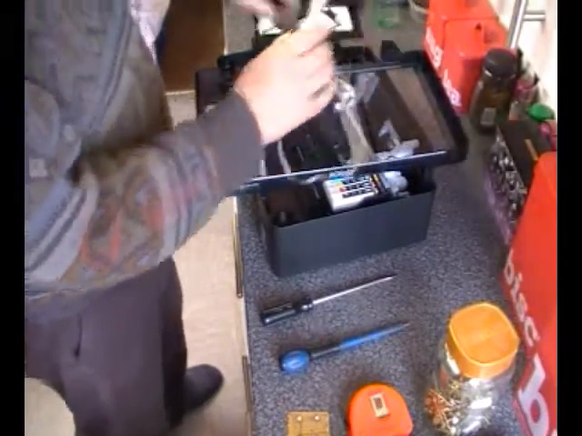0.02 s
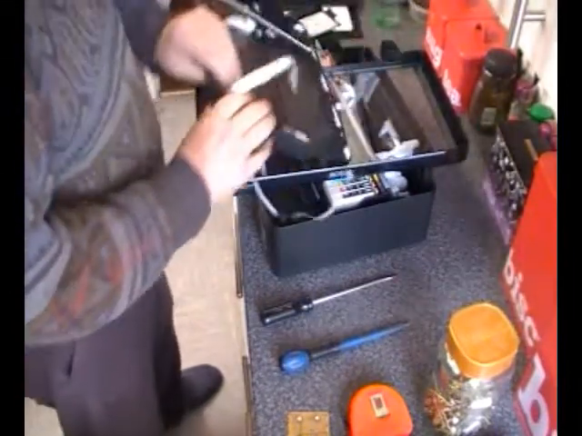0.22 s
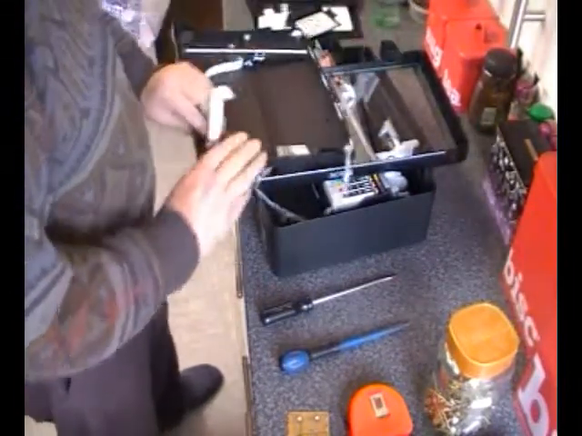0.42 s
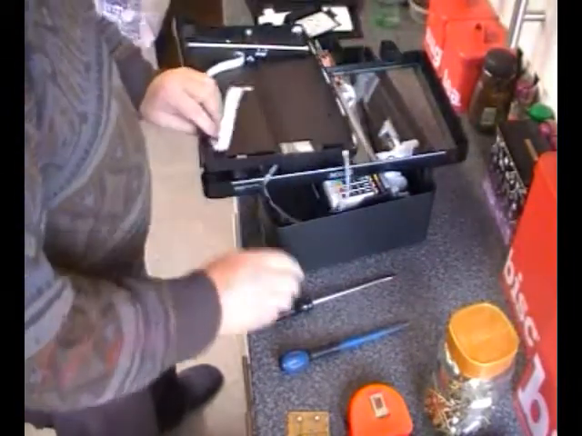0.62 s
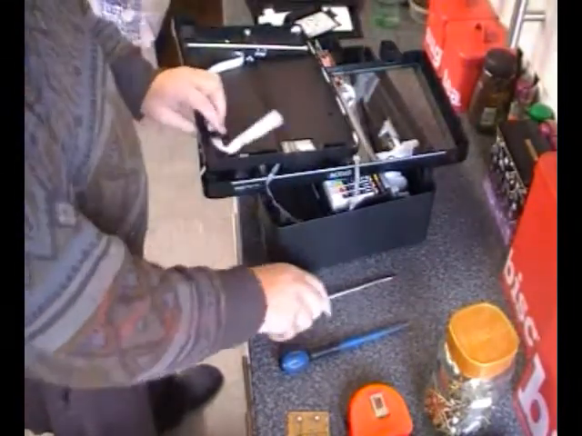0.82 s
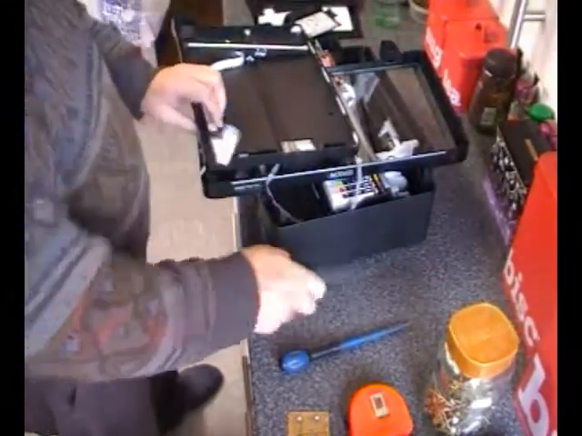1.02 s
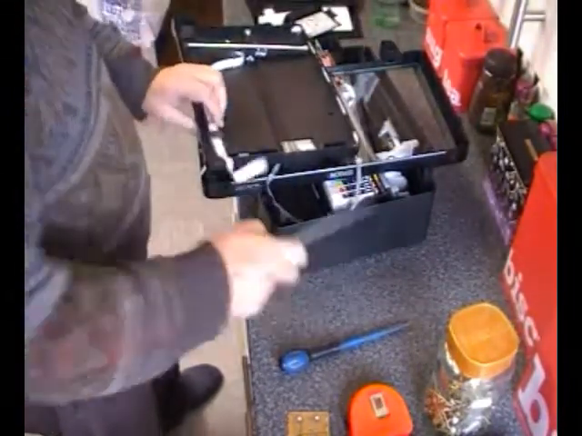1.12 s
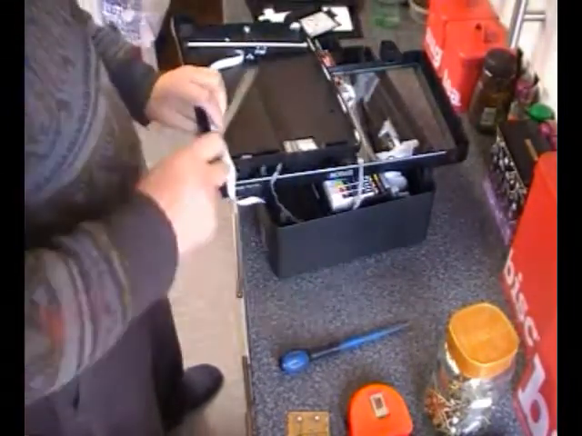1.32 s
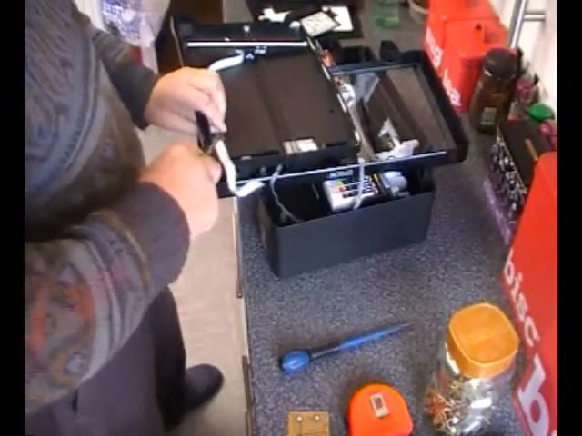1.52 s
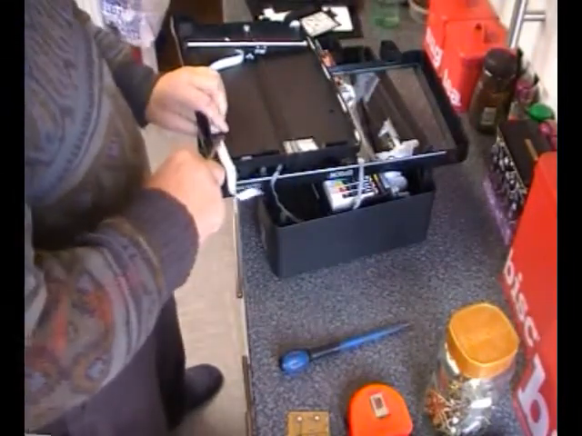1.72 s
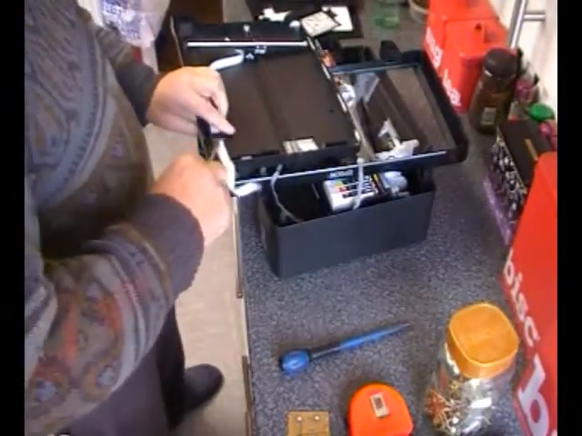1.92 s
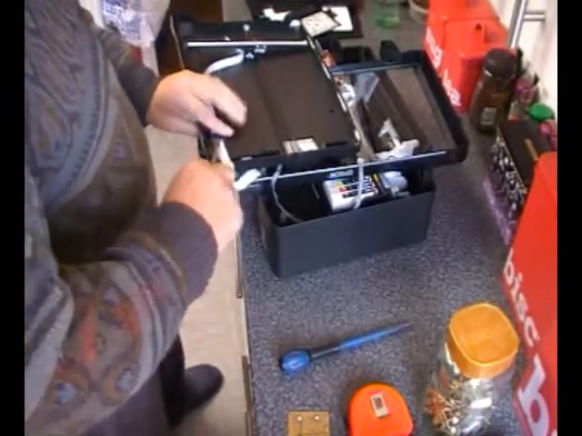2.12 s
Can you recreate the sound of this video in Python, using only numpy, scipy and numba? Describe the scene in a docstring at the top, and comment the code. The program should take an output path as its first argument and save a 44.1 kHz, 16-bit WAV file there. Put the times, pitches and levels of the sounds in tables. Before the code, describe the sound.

Plastic knocks and scrapes from a taken-apart printer, one sharp metal clink, then sparse clicks

```python
"""A small hard room: hands work a ribbon cable loose in an opened printer on a worktop, close by.
Plastic clicks and knocks are noise bursts over ringing casing modes; the cable's scrapes are dense ticks.
A loose panel edge and a snapping latch chatter as fading noise through damped resonances.
A screwdriver clinks and a small spring pings on decaying sines; a dense room tail and faint hiss lie behind."""
import sys
import numpy as np
from scipy import signal
from scipy.fft import rfft, irfft, next_fast_len
from scipy.io import wavfile
from scipy.ndimage import uniform_filter1d
from numba import njit

SR = 44100
rng = np.random.default_rng(int(sys.argv[2]) if len(sys.argv) > 2 else 0)


def to_wav(s):
    """Save 16-bit WAV."""
    ch = np.atleast_2d(s).T  # columns
    pcm = np.round(np.clip(ch, -1, 1) * 32767)  # PCM
    wavfile.write(sys.argv[1], SR, pcm.astype(np.int16))


N = 94815
TIME_S = np.arange(20480) / SR  # time axis of one sound or room tail

# Plastic clicks and knocks. Each row: start in seconds, level in dB, bass shelf in dB, treble shelf in dB,
# crack over the ring in dB, casing modes in dB, the part's own resonance in Hz, its lift in dB.
KNOCK_EVENTS = [(0.001, -27, -9.5, 3.5, -4.5, -41, 590, 15.5), (0.03, -28, 4, 16, -3, -30, 2500, 14.5),
                (0.160, -26.5, -3.5, -1.5, 1, -20, 4140, 8.5), (0.176, -38, 3, -3, 6, -14, 2200, 8),
                (0.21, -23.5, -9.5, -13, -0.5, -12, 1280, 6.5), (0.296, -27.5, 4, 0, -9, -7, 4060, 13),
                (0.330, -20, -2, 0, -11, -20, 2400, 0.5), (0.3547, -20.5, -2, -6, 11, -22, 3270, 7.5),
                (0.369, -20, -4, -7, -21, -7, 2410, -7), (0.382, -20.5, 17, 15.5, -1, -6, 397, -1),
                (0.411, -33, 11, 3, 3, -6, 2000, -8), (0.4937, -14, -6.5, -6.5, -3, 0, 1700, 2),
                (0.510, -15.5, 6.5, 8, 5.5, -12, 1700, 5), (0.517, -26, 7, -36, 10, -33, 3620, 1),
                (0.528, -17, 10, 12.5, 3, 8.5, 2650, 16), (0.5373, -25, -1, 4, 1, -28, 3050, -9),
                (0.562, -25.5, -3, -4, 15.5, -4, 850, 23), (0.5721, -30.5, 6, 2, 20.5, -19, 2780, 4),
                (0.772, -37.5, -7, 0, -33, -20, 1180, 9), (0.8212, -27, 1, 8.5, -1, -10, 11400, 5.5),
                (0.838, -30.5, 3, -3.5, -30, -21, 1470, -5.5), (1.15, -41, -24, 8.5, -16, -15, 1520, 14),
                (1.2504, -40.5, -21, -4, 10, -13, 1860, 12), (1.271, -36.5, 1, -5, -10, -22, 1980, -2),
                (1.326, -42.5, 0, 0, -3, -22, 3730, 7), (1.362, -42.5, -7, -2.5, -4, -16, 4000, 6.5),
                (1.646, -45, 13, 14, -8, -12, 865, 17), (1.665, -46.5, 6, -3, 5, 3.5, 3200, 11),
                (1.857, -28.5, 9, 0.5, 6.5, 1, 1490, 10), (1.996, -43.5, 18, -29, -9, -3, 850, 6),
                (2.0356, -35, -3, -24, 4, -3, 2900, -1.5), (2.048, -38, 23, -3, -11, -29, 520, 3)]
# Scrapes along an edge. Each row: start in seconds, length in seconds, level in dB, bass shelf in dB,
# treble shelf in dB, edge ringing in dB, the part's own resonance in Hz, its lift in dB.
SCRAPE_EVENTS = [(0.0, 0.17, -45.5, 7.5, 4, -37, 1350, 5), (0.227, 0.079, -41, -1, -4.5, -25, 722, 5.5),
                 (0.32, 0.10, -30, 1, -2, -24, 2200, 2.5), (0.422, 0.063, -34, 6.5, 1.5, -31, 850, 2),
                 (0.497, 0.079, -22, 1, 0.5, -20, 237, 10), (0.895, 0.06, -48.5, 9.5, -21, -19, 547, 1),
                 (0.94, 0.058, -40, 5.5, -9, 1, 814, 15), (1.014, 0.068, -38, -7, -12.5, 2.5, 1110, 7),
                 (1.286, 0.023, -48, 9, -6, -28, 1000, 4), (1.797, 0.091, -39, -1.5, -14, -2.5, 1420, 6.5),
                 (2.05, 0.034, -45, -1, -14, -14, 880, 13)]
# Loose panel edge tapping its seat. Each row: start in seconds, level in dB.
EDGE_TAP_EVENTS = [(1.005, -31.5), (1.0105, -23), (1.031, -23.5), (1.053, -35)]
# Latch snapping free and rebounding. Each row: start in seconds, level in dB.
LATCH_EVENTS = [(1.7215, -17.5), (1.727, -23.5), (1.736, -31)]
# Screwdriver clinks. Each row: start in seconds, level in dB.
CLINK_EVENTS = [(0.5785, -3), (0.634, -18.5)]
# Spring pings. Each row: start in seconds, level in dB.
PING_EVENTS = [(1.174, -49), (1.272, -50), (1.363, -49)]

# Ringing modes of the printer casing. Each row: frequency in Hz, relative level in dB, t60 in seconds.
CASING_MODES = [(209.4, -24.5, 0.37), (251, -14, 0.31), (567, -4.5, 0.31), (794, -3, 0.4),
                (879, 5.5, 0.087), (1184, 3, 0.21), (1503, 5, 0.37), (1744, 0.5, 0.18), (2025, -4, 0.25),
                (2800, 7.5, 0.061), (3440, 4.5, 0.053)]
# Ringing modes of the steel shaft. Each row: frequency in Hz, relative level in dB, t60 in seconds.
STEEL_MODES = [(4888, -5, .22), (8220, -4, .15), (10410, -7, .15), (12260, 0, .12)]
# Ringing modes of the small spring. Each row: frequency in Hz, relative level in dB, t60 in seconds.
SPRING_MODES = [(2227, 0, 0.17), (2270, -7, 0.1)]
# Damped resonances of the panel edge. Each row: frequency in Hz, width at -6 dB in Hz, relative level in dB.
EDGE_RESONANCES = [(380, 95, -20), (880, 320, -7), (1420, 180, -5), (1666, 166, 2), (2370, 370, -8.5),
                   (3060, 530, -9), (4470, 230, -14), (5780, 330, -15.5), (7900, 9000, -24.5)]
# Damped resonances of the latch. Each row: frequency in Hz, width at -6 dB in Hz, relative level in dB.
LATCH_RESONANCES = [(236, 91, -25), (564, 187, -8.5), (844, 135, 1.5), (1280, 500, -8.5), (1760, 260, 1),
                    (2160, 290, 0), (3080, 670, -6.5), (4300, 2500, -15), (6420, 490, -10),
                    (7170, 1200, -15), (9280, 940, -13), (11700, 1600, -23.5)]

# Colour of struck and rubbed plastic. Each row: frequency in Hz, relative level in dB.
PLASTIC_COLOUR = [(60, -46.5), (150, -28.5), (230, -26), (400, -8), (660, -3), (840, -1), (1020, -3),
                  (1650, 0.5), (2500, -3.5), (3200, -1.5), (5200, -7), (6600, -7.5), (8200, -8),
                  (9500, -10.5), (12500, -13.5)]
# Colour of the metallic tick. Each row: frequency in Hz, relative level in dB.
METAL_COLOUR = [(100, -65), (1000, -10.5), (4000, -8.5), (7000, -12), (8200, 0.5), (9500, -5.5),
                (12500, -0.5)]
# Colour of the background hiss. Each row: frequency in Hz, relative level in dB.
AIR_COLOUR = [(25, 3), (60, -5), (130, -11), (250, -3), (500, 0.5), (1200, 1), (2300, -0.5), (4500, -8),
              (8000, -11), (12500, -11.5)]
# Decay of the room. Each row: frequency in Hz, t60 in seconds.
ROOM_DECAY = [(200, 0.25), (600, 0.44), (1500, 0.29), (4000, 0.38), (10000, 0.26)]

# The bass shelf fades out from BASS to MID, the treble shelf fades in from UPPER to TREBLE.
BASS_HZ, MID_HZ, UPPER_HZ, TREBLE_HZ = 530, 1620, 2600, 7100
PART_OCTAVES = 0.26  # distance at which a part's lift in dB has halved
ATTACK_S, CRACK_T60_S, RING_T60_S = 0.00078, 0.031, 0.25
TICKS_PER_S, TICK_SPREAD_DB = 1400, 4
SCRAPE_RISE_S, SCRAPE_FALL_S = 0.0015, 0.02
EDGE_T60_S, LATCH_T60_S = 0.13, 0.18
CHATTER_SPREAD_DB, CHATTER_STEP = 2, SR // 1000  # step in samples, about 1 ms
CLINK_T60_S, STEEL_DB = 0.04, -25  # steel ring relative to the clink level
AIR_DB = -55.5
ROOM_DB, ROOM_DELAY_S, ROOM_BUILD_S = -6.5, 0.0048, 0.0017
LIMIT_DB, LIMIT_RATIO, LIMIT_ATTACK_S, LIMIT_RELEASE_S = -13.5, 21, 0.0027, 0.1
LOW_CUT_HZ, TOP_HZ = 110, 12700


def knocks(size=8192):
    """Each contact cracks, then dies away in the dense ring of the panels and the main casing modes."""
    panels, casing = np.zeros(N), np.zeros(N)
    ring = modes(CASING_MODES)[:2 * size]
    crack, body = fade(CRACK_T60_S)[:size], fade(RING_T60_S)[:size]
    rise = attack()[:size]
    for start, db, bass_db, treble_db, crack_db, modes_db, part_hz, lift_db in KNOCK_EVENTS:
        envelope = rise * (undb(crack_db) * crack + body) / 2
        burst = rng.standard_normal(size) * envelope
        plastic = colour(PLASTIC_COLOUR, bass_db, treble_db, part_hz, lift_db)
        add(panels, start, undb(db) * through(burst, plastic))
        add(casing, start, undb(db + modes_db) / 2 * ring)
    return panels, low_cut(casing)


def scrapes(size=8192):
    """Parts slide in dense stick-slip ticks that also set the rubbed edge ringing."""
    out, t = np.zeros(N), TIME_S[:size]
    for start, length, db, bass_db, treble_db, edge_db, part_hz, lift_db in SCRAPE_EVENTS:
        ticks = rng.random(size) < TICKS_PER_S / SR
        signs = rng.choice([-1, 1], size)
        strengths = undb(TICK_SPREAD_DB * rng.standard_normal(size))
        slips = unit(ticks * signs * strengths)
        rise = 1 - np.exp(-t / SCRAPE_RISE_S)
        fall = np.exp(-np.maximum(t - length, 0) / SCRAPE_FALL_S)
        force = undb(db) * slips * rise * fall
        plastic = colour(PLASTIC_COLOUR, bass_db, treble_db, part_hz, lift_db)
        add(out, start, through(force, plastic))
        add(out, start, undb(edge_db) * through(force, resonances(EDGE_RESONANCES, treble_db)))
    return out


def latch():
    """The latch snaps free and rebounds, sounding its damped resonances."""
    return rattle(LATCH_EVENTS, LATCH_RESONANCES, LATCH_T60_S)


def panel_edge():
    """A loose panel edge taps its seat, sounding its damped resonances."""
    return rattle(EDGE_TAP_EVENTS, EDGE_RESONANCES, EDGE_T60_S)


def rattle(hits, part, t60, size=12288):
    """Each hit drives the part with fading noise whose level jumps at random in short steps."""
    force = np.zeros(N)
    envelope = (fade(t60) * attack())[:size]
    for start, db in hits:
        noise = rng.standard_normal(size)
        steps = np.repeat(rng.standard_normal(size), CHATTER_STEP)[:size]
        chatter = unit(noise * undb(CHATTER_SPREAD_DB * steps))
        add(force, start, undb(db) * chatter * envelope)
    return through(force, resonances(part))


def screwdriver():
    """The steel shaft clinks: a bright noise tick and a thin ring of high modes."""
    out, ring = np.zeros(N), modes(STEEL_MODES)
    for start, db in CLINK_EVENTS:
        burst = rng.standard_normal(len(TIME_S)) * fade(CLINK_T60_S)
        add(out, start, undb(db) * through(burst, colour(METAL_COLOUR)))
        add(out, start, undb(db + STEEL_DB) * ring)
    return out


def spring():
    """A small spring is brushed and pings on two close modes."""
    out, ring = np.zeros(N), modes(SPRING_MODES)
    for start, db in PING_EVENTS:
        add(out, start, undb(db) * ring)
    return out


def room(x, count=6):
    """Close walls return a dense noise tail that decays at a different rate in each band."""
    noise = rfft(rng.standard_normal(len(TIME_S)))
    hz = np.fft.rfftfreq(len(TIME_S), 1 / SR)
    centres = np.geomspace(200, 11000, count)
    tail = np.zeros(len(TIME_S))
    for centre, peak in zip(centres, np.eye(count)):
        band = log_curve(hz, list(zip(centres, peak)))  # overlapping bands that sum to one
        tail += irfft(noise * band) * fade(log_curve(centre, ROOM_DECAY))
    tail *= 1 - np.exp(-np.maximum(TIME_S - ROOM_DELAY_S, 0) / ROOM_BUILD_S)
    return undb(ROOM_DB) * through(x, tail / np.linalg.norm(tail))


def hiss():
    """Steady coloured noise lies faintly under everything."""
    return undb(AIR_DB) * through(rng.standard_normal(N), colour(AIR_COLOUR))


def modes(table):
    """Free ring of a struck part: decaying sines in random phase, scaled by their combined rms."""
    ring = np.zeros(len(TIME_S))
    for hz, db, t60 in table:
        ring += undb(db) * fade(t60) * np.sin(2 * np.pi * (hz * TIME_S + rng.random()))
    rms = np.sqrt(sum(undb(db) ** 2 for _, db, _ in table) / 2)
    return ring * attack() / rms


def resonances(table, treble_db=0, size=2048):
    """Response of a well-damped part: broad peaks with dark valleys between them."""
    hz = np.fft.rfftfreq(size, 1 / SR) + 1  # kept off zero
    power = np.zeros(len(hz))
    for centre, width, db in table:
        detune = (hz - centre ** 2 / hz) / width
        power += undb(db) ** 2 / (1 + detune ** 2) ** 2
    tilt = log_curve(hz, [(MID_HZ, 0), (TREBLE_HZ, treble_db)])
    return causal(10 * np.log10(power) + tilt)


def colour(points, bass_db=0, treble_db=0, part_hz=1000, lift_db=0, size=1024):
    """Response with the given spectrum, two shelves and one resonance."""
    hz = np.fft.rfftfreq(size, 1 / SR)
    shelves = log_curve(hz, [(BASS_HZ, bass_db), (MID_HZ, 0), (UPPER_HZ, 0), (TREBLE_HZ, treble_db)])
    octaves = np.log2((hz + 1) / part_hz)
    lift = lift_db / (1 + (octaves / PART_OCTAVES) ** 2)
    return causal(log_curve(hz, points) + shelves + lift)


def causal(db):
    """Minimum-phase response of unit energy from a spectrum in dB, by folding its cepstrum."""
    cepstrum = irfft(np.log(undb(db)))
    half = len(cepstrum) // 2
    cepstrum[1:half] *= 2
    cepstrum[half + 1:] = 0
    response = irfft(np.exp(rfft(cepstrum)))
    return response / np.linalg.norm(response)


def through(x, response):
    """Pass a sound through a response by fast convolution."""
    n = next_fast_len(len(x) + len(response), True)
    return irfft(rfft(x, n) * rfft(response, n), n)[:N]


def low_cut(x):
    """Roll off the deep bass."""
    return signal.sosfilt(signal.butter(2, LOW_CUT_HZ, "high", fs=SR, output="sos"), x)


def add(out, start, x):
    """Mix a sound in at its start time."""
    i = int(start * SR)
    part = x[:max(N - i, 0)]
    out[i:i + len(part)] += part


def log_curve(hz, points):
    """Read (Hz, value) points on a log-frequency axis."""
    f, v = np.array(sorted(points)).T
    return np.interp(np.log(hz + 1e-9), np.log(f), v)


def attack():
    """Quick exponential rise of a contact."""
    return 1 - np.exp(-TIME_S / ATTACK_S)


def fade(t60):
    """Exponential decay by 60 dB in t60 seconds."""
    return np.exp(-np.log(1000) * TIME_S / t60)


def unit(x):
    """Scale to rms 1."""
    return x / np.sqrt(np.mean(x ** 2))


def undb(db):
    """Decibels to gain."""
    return 10 ** (np.asarray(db) / 20)


@njit
def follow(x, attack_step, release_step):
    """Level follower that rises fast and falls slowly."""
    out, level = np.empty(len(x)), 0.
    for i in range(len(x)):
        a = abs(x[i])
        level += (a - level) * (attack_step if a > level else release_step)
        out[i] = level
    return out


def scene():
    """Handling sounds with the room tail of their contacts over a faint hiss."""
    panels, casing = knocks()
    contacts = panels + scrapes() + latch() + panel_edge() + screwdriver()
    return (contacts + casing + spring() + room(contacts) + hiss())[None]


def record(dry):
    """Gain control holds down loud clatter, peaks are rounded, deep bass and the top octave are cut."""
    level = follow(dry[0], 1 / (LIMIT_ATTACK_S * SR), 1 / (LIMIT_RELEASE_S * SR))
    excess = np.maximum(level / undb(LIMIT_DB), 1)
    gain = uniform_filter1d(excess ** (1 / LIMIT_RATIO - 1), size=220)  # smoothed over 5 ms
    rounded = np.tanh(dry * gain)
    top_cut = signal.ellip(10, .2, 70, TOP_HZ, fs=SR, output="sos")
    return signal.sosfilt(top_cut, low_cut(rounded))


dry = scene()
out = record(dry)
to_wav(out)
```